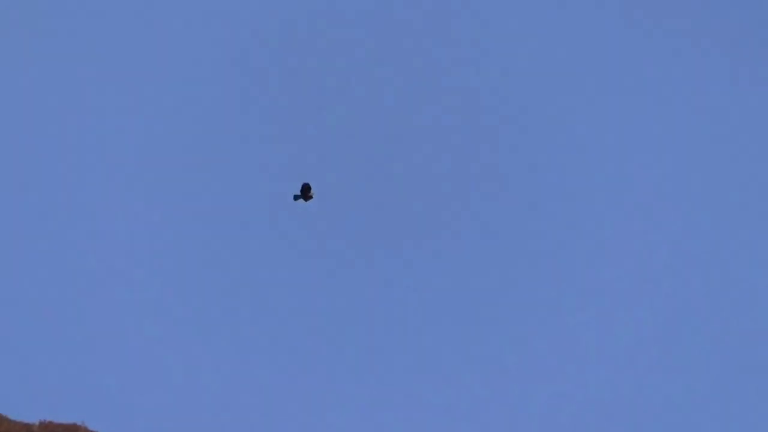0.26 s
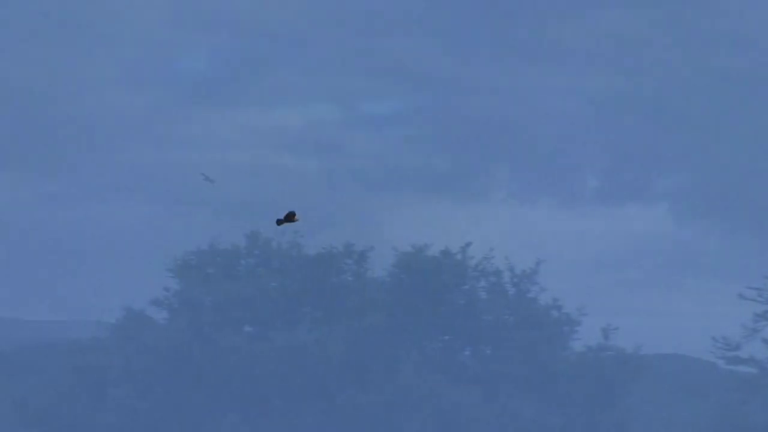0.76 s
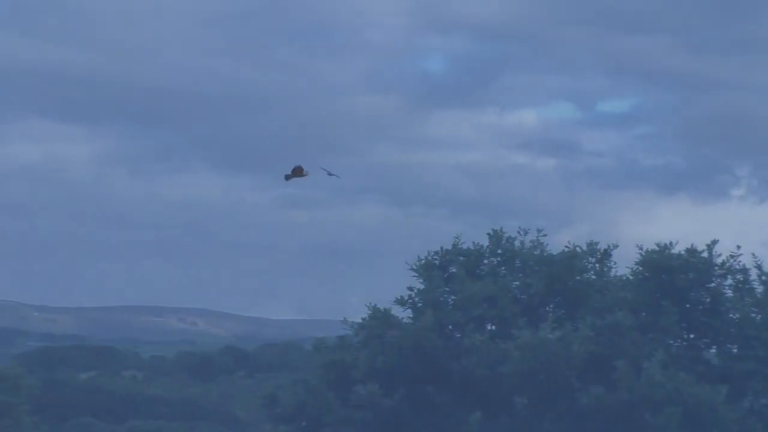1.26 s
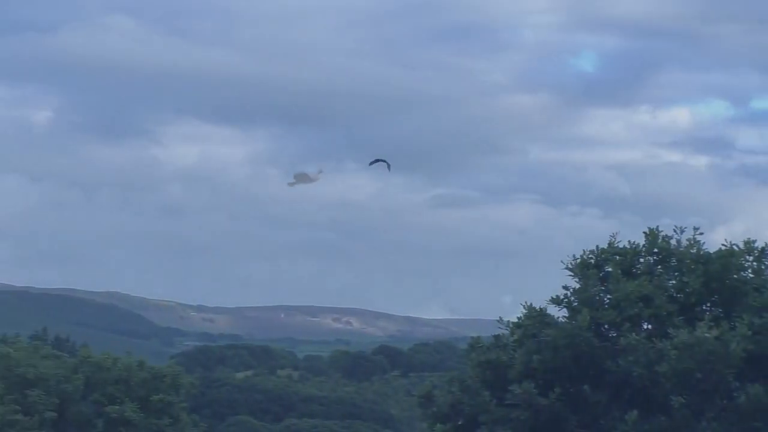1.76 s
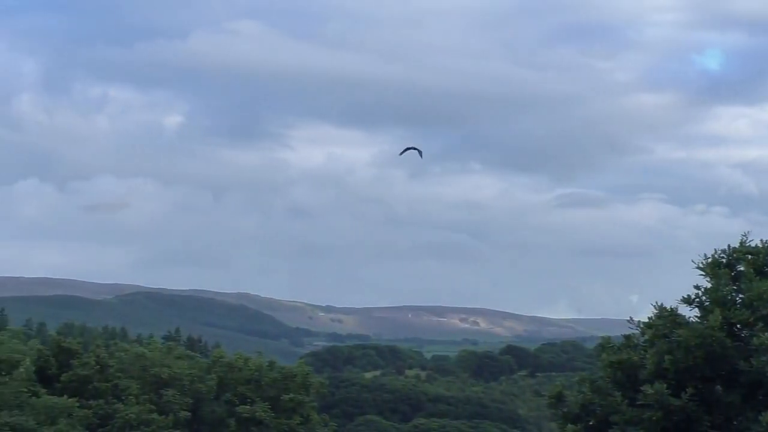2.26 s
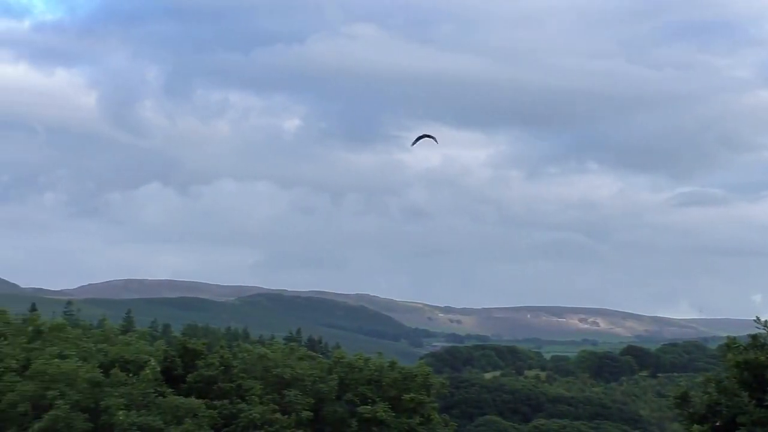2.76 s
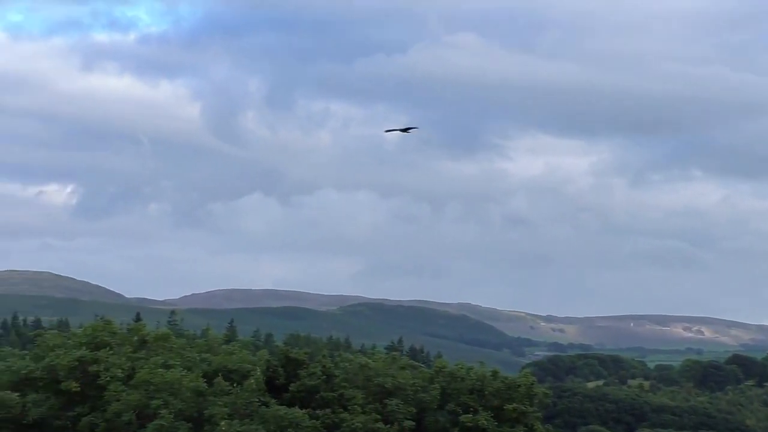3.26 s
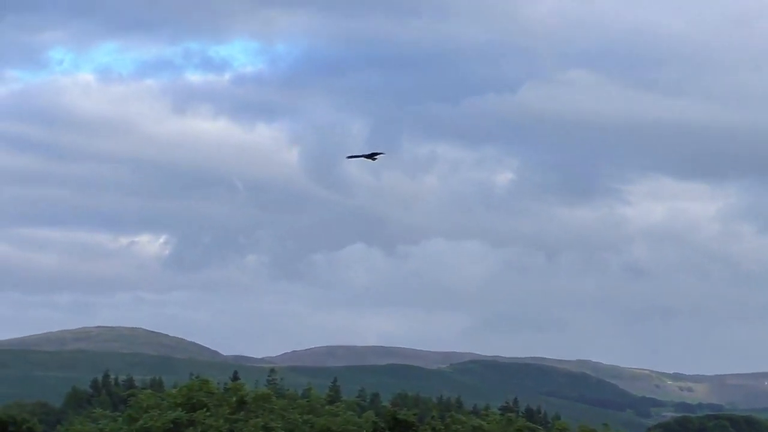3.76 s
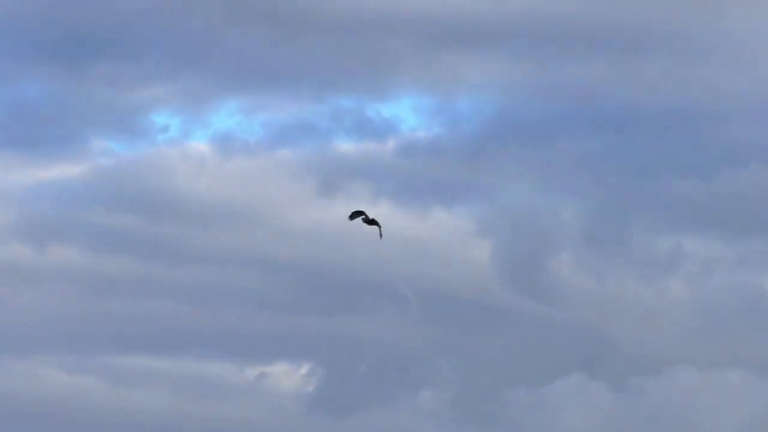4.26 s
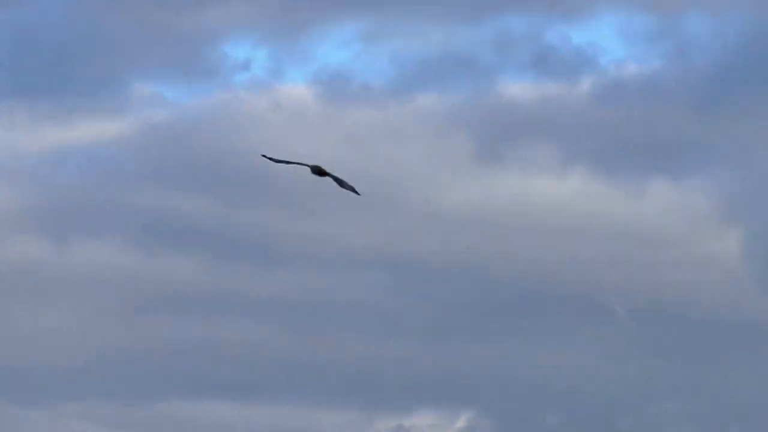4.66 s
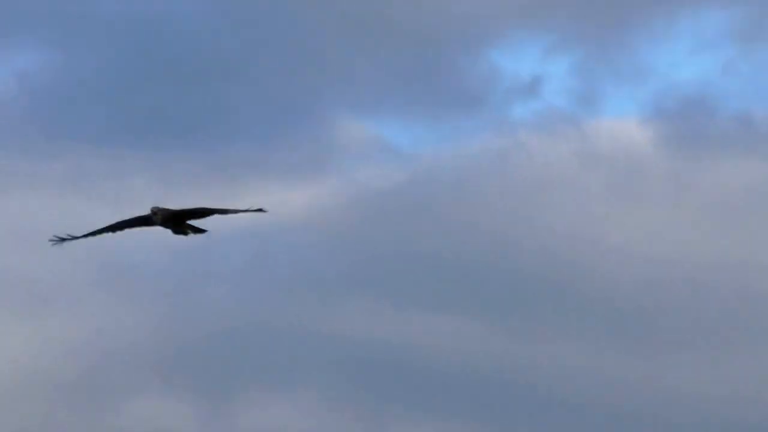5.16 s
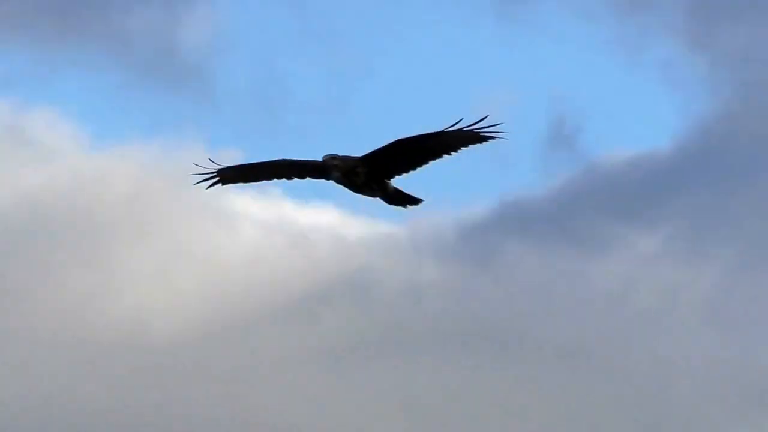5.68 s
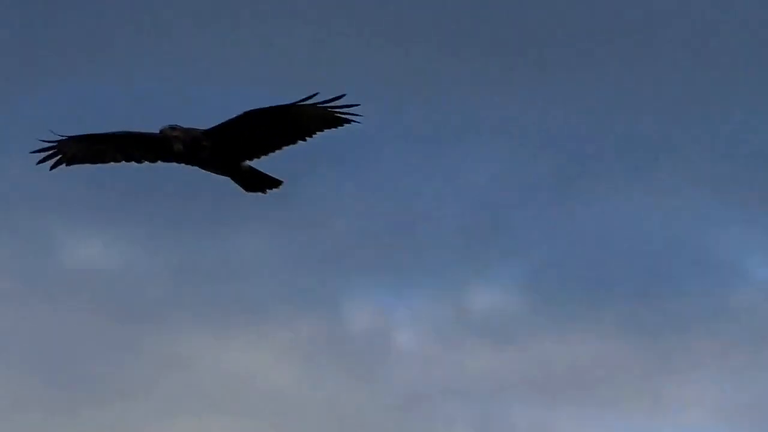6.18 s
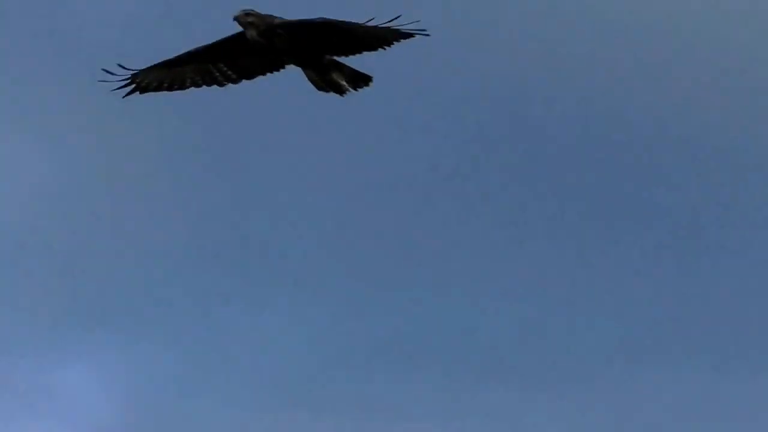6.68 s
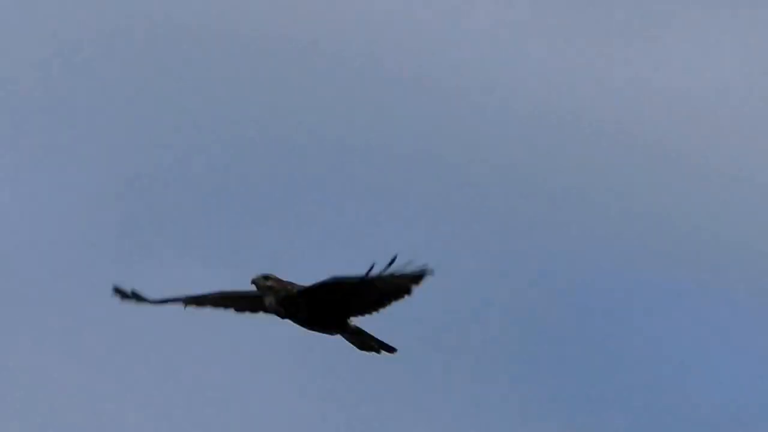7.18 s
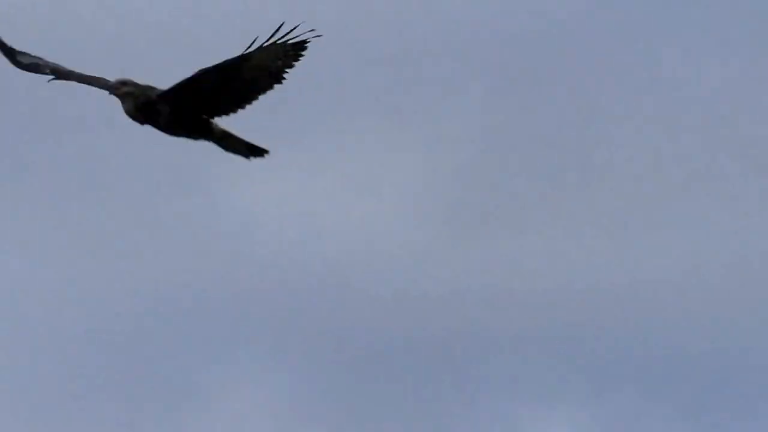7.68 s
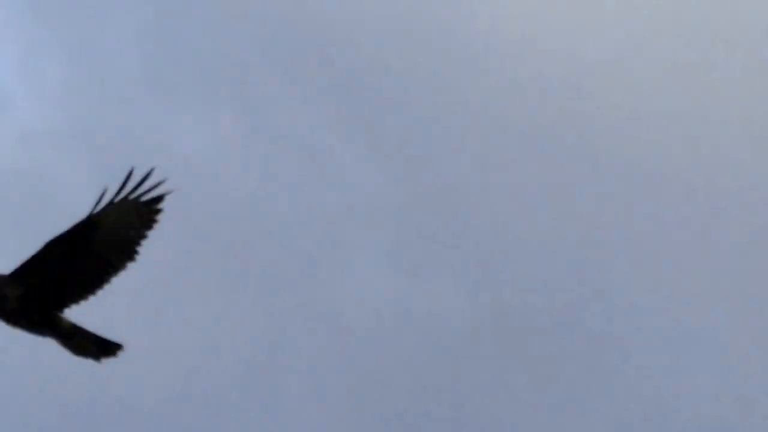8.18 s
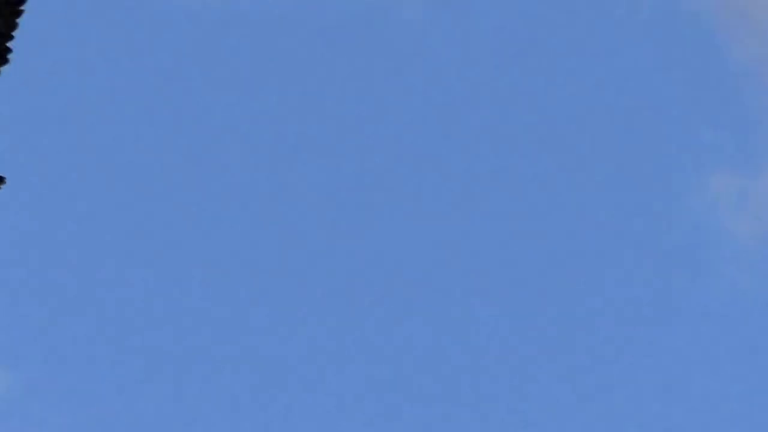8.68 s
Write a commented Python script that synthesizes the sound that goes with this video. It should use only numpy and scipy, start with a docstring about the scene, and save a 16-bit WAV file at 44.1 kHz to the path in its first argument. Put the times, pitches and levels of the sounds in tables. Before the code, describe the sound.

Three drawn-out, cracking cries from a nearby bird of prey echo off trees, with faint far calls and a soft opening hiss.

```python
"""A wooded valley, heard from a camera microphone. A broad hiss opens and fades out while a far bird calls.
At 2.2 s a buzzard mews nearby, its voice wavering and cracking; the trees echo both birds. After some
rustling a low drone comes up. The second mew, at 5 s, breaks into a whistle, and a camera part clicks.
The far bird answers at 6.6 s, and at 8 s the buzzard mews and breaks once more. Valley air, wind on the
microphone and the microphone's own treble hiss run to the end."""
import sys
import numpy as np
from scipy import signal
from scipy.fft import rfft, irfft, next_fast_len
from scipy.io import wavfile
from scipy.ndimage import uniform_filter1d

SR = 44100
rng = np.random.default_rng(int(sys.argv[2]) if len(sys.argv) > 2 else 0)


def log_audio(samples):
    """Write samples as a 16-bit WAV file to the path given in sys.argv[1]."""
    # one column per channel
    frames = np.atleast_2d(samples).T
    # limit to full scale, then quantise
    limited = np.clip(frames, -1, 1)
    pcm = np.round(limited * 32767).astype(np.int16)
    wavfile.write(sys.argv[1], SR, pcm)


N = 393813
T = np.arange(N) / SR
SIDE = np.array([[1], [-1]])  # opposite signs left and right give width

# short rustles: middle t/s, length/s, relative level/dB
RUSTLES = [(2.08, .12, -84), (3.77, 0.048, -86), (4.05, 0.092, -90), (4.4, 0.21, -80), (4.5, .15, -87.5),
           (4.62, .16, -77)]


def buzzard():
    """Close to the microphone: three hoarse mews of twelve harmonics on a wavering pitch."""
    # per unbroken stretch of voice: t/s, second partial f/Hz, its level/dB, others' relative level/dB
    mews = [
        [(2.225, 2430, -75, -15), (2.236, 2460, -50, -22), (2.25, 2790, -51.5, -5), (2.268, 3000, -51.5, 4),
         (2.305, 3030, -42, 4.5), (2.344, 2920, -39.5, -0.5), (2.375, 2720, -47, 2.5), (2.388, 2880, -46.5, -1),
         (2.41, 2875, -45.5, 4), (2.456, 2936, -40.5, 0.5), (2.494, 2665, -47, 3), (2.534, 2810, -42, 1.5),
         (2.585, 2680, -46, 5), (2.617, 2290, -48, -9.5), (2.645, 2560, -48.5, -7), (2.686, 2783, -49.5, 4.5),
         (2.716, 2586, -43, -8), (2.745, 2230, -52.5, -5), (2.79, 2382, -51, -0.5), (2.84, 2153, -53.5, 1),
         (2.855, 2174, -86, -5)],
        [(4.95, 2400, -71, -15), (4.96, 2500, -46.5, -12), (4.976, 2925, -47.5, 7.5), (5.0, 3010, -37, 5.5),
         (5.014, 3155, -43.5, 11.5), (5.028, 2903, -38.5, 5), (5.05, 2850, -42.5, 6), (5.058, 2900, -44.5, 5),
         (5.068, 3040, -41, 3), (5.09, 3126, -41.5, 10), (5.112, 3007, -39.5, 4.5), (5.156, 2790, -44, 6.5),
         (5.198, 2824, -43.5, 7), (5.234, 2894, -40.5, 10), (5.286, 2515, -40.5, -6), (5.298, 2694, -53, -4)],
        [(5.381, 2680, -49, 2.5), (5.401, 2550, -39, -9), (5.443, 2653, -38, -6), (5.471, 2484, -36.5, -13),
         (5.497, 2530, -34.5, -5), (5.523, 2190, -46, -4), (5.551, 2330, -45.5, -6), (5.589, 2604, -42.5, -3.5),
         (5.62, 2217, -47.5, -3), (5.642, 2147, -49, -16), (5.685, 2160, -46.5, -8.5), (5.71, 2070, -64, -16)],
        [(7.992, 2420, -54, -12), (7.998, 2530, -46, -5.5), (8.006, 2790, -39, -1.5), (8.016, 2937, -40.5, 9),
         (8.052, 2927, -36, 10), (8.062, 3265, -41, 12), (8.072, 3006, -37, 9.5), (8.097, 3290, -42.5, 12),
         (8.112, 3460, -54, 21)],
        [(8.168, 2907, -46, 11), (8.186, 2919, -39.5, 11), (8.23, 2881, -35, 11), (8.265, 2780, -36, 4.5),
         (8.298, 2630, -30.5, -6.5), (8.318, 2734, -37.5, -4.5), (8.345, 2810, -39, -1.5),
         (8.368, 2833, -38.5, 1.5), (8.403, 2515, -34.5, -11), (8.466, 2677, -34.5, -5),
         (8.51, 2582, -34.5, -10.5), (8.535, 2240, -40, -8.5), (8.555, 2443, -39, -9.5),
         (8.59, 2590, -37, -4.5), (8.62, 2632, -39.5, -9.5), (8.65, 2130, -44, -9.5), (8.67, 2010, -73, -18)],
    ]
    # throat colour, the other partials against the second: f/Hz, level/dB
    throat = [(1050, -21), (1250, -12), (1450, -17), (1650, -23), (3300, -5), (4300, -13), (5700, -22.5),
              (7200, -34), (9000, -34), (12000, -47), (15000, -49.5)]
    return voice(mews, throat, np.arange(1, 13) / 2, timbre_drift=1, flicker_db=.9, jitter=.0036,
                 shimmer_db=1.8, breath_db=-39, rasp_db=7.5, breath_hz=1300)


def whistles():
    """The buzzard's voice breaks twice into a nearly pure whistle with soft edges and a sagging pitch."""
    # breaks: start t/s, length/s, f/Hz, level/dB
    breaks = [(5.301, 0.077, 2340, -36), (8.116, 0.046, 2360, -31)]
    # colour of the overtones: f/Hz, level/dB
    overtones = [(2300, 5.5), (4700, -21), (7000, -36.5), (12000, -50)]
    sag_hz_per_s, edge_s, edge_db = 730, .036, -9.5
    stretches = []
    for start, length, hz, db in breaks:
        outline = (0, edge_db), (edge_s, 0), (length - edge_s, 0), (length, edge_db)
        stretches.append([(start + t, hz - sag_hz_per_s * t, db + dip, 0) for t, dip in outline])
    return voice(stretches, overtones, np.arange(1, 6), timbre_drift=0, flicker_db=1, jitter=.0035,
                 shimmer_db=1.2, breath_db=-35, rasp_db=6, breath_hz=1300)


def far_bird():
    """Far off in the valley: two faint, falling mews whose upper partials are mostly breath."""
    # per mew: t/s, second partial f/Hz, its level/dB, others' relative level/dB
    mews = [
        [(1.17, 2500, -77, -12), (1.19, 2528, -67.5, -10), (1.29, 2470, -61, -10), (1.32, 2375, -64, -10),
         (1.42, 2296, -67, -10)],
        [(6.615, 2125, -76, 2), (6.635, 2357, -54.5, -5), (6.655, 2540, -52.5, -7.5), (6.69, 2588, -59, 3),
         (6.75, 2518, -56, 1.5), (6.82, 2398, -53, -1), (6.9, 2335, -58.5, 2), (6.98, 2296, -67.5, 10),
         (7.08, 2214, -68.5, 9), (7.19, 2184, -73.5, 13), (7.3, 2067, -71, 11), (7.35, 2090, -90.5, 18)],
    ]
    # throat colour, the other partials against the second: f/Hz, level/dB
    throat = [(1050, -21), (1300, -18), (3400, -24), (4600, -40), (7000, -40), (12000, -47)]
    return voice(mews, throat, np.arange(1, 13) / 2, timbre_drift=0, flicker_db=.5, jitter=.004,
                 shimmer_db=3, breath_db=-53, rasp_db=34, breath_hz=1100)


def voice(stretches, throat, multiples, timbre_drift, flicker_db, jitter, shimmer_db,
          breath_db, rasp_db, breath_hz):
    """A bird's throat: partials at multiples of a wavering lead partial, each smeared by air noise."""
    # the voice cracks for an instant: middle t/s, length/s, pitch jump/%
    cracks = [(2.388, 0.013, 4.5), (2.501, 0.0081, 3), (2.634, 0.011, 4), (2.73, 0.015, -2),
              (5.017, 0.015, 4), (5.056, 0.009, 6.5), (5.456, .01, -4.5), (8.06, 0.018, 1.5),
              (8.396, 0.011, -3.5)]
    # the lowest partial waxes and wanes on its own: t/s, relative level/dB
    lowest = [(2.23, 15), (2.3, -6), (2.35, 0), (2.41, 2), (2.5, 2), (2.56, -4), (2.62, -7), (2.69, 1),
              (2.77, -11), (2.85, -4), (4.96, 2.5), (5.0, -2.5), (5.06, 0.5), (5.11, -1), (5.17, -2),
              (5.24, -2), (5.29, 2.5), (5.4, -4), (5.44, 4), (5.49, -1.5), (5.59, -0.5), (5.65, -6),
              (5.7, -1.5), (8.0, 1.5), (8.05, -15.5), (8.105, 2), (8.19, -4), (8.23, -7), (8.29, -0.5),
              (8.345, 8), (8.4, 2), (8.47, 4), (8.51, 9), (8.535, 2.5), (8.61, 3), (8.66, 9)]
    # spells of alternating strong and weak cycles: middle t/s, length/s, level/dB
    doublings = [(2.3, 0.12, -62), (2.535, 0.048, -56), (2.785, 0.086, -65), (4.992, 0.038, -65.5),
                 (5.21, 0.071, -54), (8.04, 0.071, -75), (8.225, 0.092, -53)]
    # the lines they add between the partials: multiple of the lead partial, relative level/dB
    half_lines = [(.75, 0), (1.25, -8), (1.75, -6), (2.25, -16), (2.75, -22), (3.25, -26)]
    bright_hz, dull_db_per_octave = 2904, 12
    glide, ramp = int(.009 * SR), .0019 * SR  # samples
    throat_hz, throat_db = np.transpose(throat)
    out = np.zeros(N)
    for rows in stretches:
        times, *columns = np.transpose(rows)
        span = slice(int((times[0] - .002) * SR), int((times[-1] + .003) * SR))
        t = T[span]
        n = len(t)
        hz, lead_db, others_db = (uniform_filter1d(np.interp(t, times, c), glide) for c in columns)
        hz = hz * (1 + sum(jump / 100 * bell(t, at, length) for at, length, jump in cracks))
        phase = 2 * np.pi * np.cumsum(hz * (1 + jitter * walk(197.2, n))) / SR
        # as the pitch sinks, partials above the third dull, the highest most
        dull_db = dull_db_per_octave * np.minimum(np.log2(hz / bright_hz), 0)
        lowest_db = curve(lowest, 0)[span]
        lines = []
        for m in multiples:
            drift_db = timbre_drift * ((m < 1) * lowest_db + max(m - 1.5, 0) * dull_db)
            flutter_db = flicker_db * min(m, 2.5) * walk(35, n)
            colour_db = np.interp(np.log(m * hz), np.log(throat_hz), throat_db)
            against_lead_db = 0 if m == 1 else others_db + drift_db + flutter_db + colour_db
            lines.append((m, undb(lead_db + against_lead_db)))
        lines += [(m, undb(db) * bumps(doublings, t)) for m, db in half_lines]
        edge = np.clip(np.minimum(np.arange(n), np.arange(n)[::-1]) / ramp, 0, 1)
        for m, gain in lines:
            hoarseness = undb(min(breath_db + rasp_db * m, 9))  # grows toward the high partials
            breath = hoarseness * (walk(breath_hz, n) + 1j * walk(breath_hz, n))
            tone = (undb(shimmer_db * walk(93.96, n)) + breath) * np.exp(1j * m * phase)
            out[span] += np.sqrt(2) * edge * gain * (m * hz < .45 * SR) * tone.real
    return out


def trees(call, branch_db, branch_t60, slope_db, slope_t60, slope_delay_s):
    """Quick scatter from near branches, then a longer wash from the slopes, blurred by moving leaves."""
    # colour of the scatter off the branches: f/Hz, level/dB
    branches = [(900, 1.5), (2000, 0), (3000, -1), (4500, 1.5), (6500, 1.5), (10000, -23)]
    # colour of the wash off the wooded slopes: f/Hz, level/dB
    slopes = [(900, -7), (1900, -4.5), (2250, 1), (2550, -1.5), (2800, 5), (3200, -10), (4200, -11.5),
              (6000, -41), (10000, -42.5)]
    t = T[:3 * SR // 2]
    quick = undb(-60 * t / branch_t60) * np.clip(t / .00387, 0, 1)
    late = undb(-60 * t / slope_t60) * np.clip((t - slope_delay_s) / .01, 0, 1)
    out = 0
    for channels in (np.ones((2, 1)), undb(-63.5) * SIDE):
        scatter = colour(call * (.6 + .8 * walk(200)), branches)
        wash = colour(call * walk(300), slopes)
        for source, decay, db in ((scatter, quick, branch_db), (wash, late, slope_db)):
            tail = rng.standard_normal(len(t)) * decay / np.sqrt(np.sum(decay ** 2))
            out = out + channels * undb(db) * signal.fftconvolve(source, tail)[:N]
    return out


def camera_click():
    """Right at the microphone, a small hard camera part snaps and bounces, ringing its short modes."""
    # the snap and its bounces: t/s, relative level/dB
    blows = [(5.5295, -40), (5.5310, -36), (5.5326, -23), (5.5333, -23), (5.5347, -32), (5.5366, -40)]
    # modes of the part: f/Hz, relative level/dB, t60/s
    modes = [(1300, -4.5, .010), (2300, -14, .006), (4800, -17, .005), (7300, -10, .004), (9300, -6, .004),
             (11900, 2.5, .004), (14500, -8, .004)]
    out, t = np.zeros(N), T[:SR // 20]
    for at, blow_db in blows:
        ring = sum(undb(db - 60 * t / t60) * np.sin(2 * np.pi * (hz * t + rng.random()))
                   for hz, db, t60 in modes)
        snap = undb(-10 - 60 * t / .005) * rng.standard_normal(len(t))
        start = int(at * SR)
        out[start:start + len(t)] += undb(blow_db) * (ring + snap)
    low_cut = signal.butter(5, 1000, "high", fs=SR, output="sos")  # too small to push bass
    thin = undb(2) * signal.sosfilt(low_cut, out)
    return thin + undb(-28) * np.roll(thin, 40) * SIDE


def opening_hiss():
    """A broad hiss, partly wide, that holds steady and then fades away."""
    # spectrum in the middle: f/Hz, level/dB
    mid_colour = [(59, -47), (100, -30), (144, -10), (262, -2.5), (458, -4.5), (577, -9), (1370, 5.5),
                  (1830, 0.5), (2360, -1.5), (8570, -31), (10000, -55), (13000, -65.5), (22000, -120)]
    # spectrum at the sides: f/Hz, level/dB
    side_colour = [(59, -25), (100, 0), (269, 1), (581, -13.5), (1100, -3.5), (2100, -1.5), (5440, -19),
                   (6540, -36), (8000, -58), (10400, -68.5), (17600, -120)]
    mid = undb(-55) * noise(mid_colour, .69, 4.52)
    side = undb(-63.5) * noise(side_colour, .8, 6.2)
    return opening_fade() * (mid + side * SIDE)


def valley_air():
    """The soft rush of the open valley, fuller while the opening hiss lasts."""
    # its slow rise and fall: t/s, level/dB
    levels = [(0, -70), (3.0, -77.5), (4.5, -76.5), (5.4, -77.5), (6.0, -82.5), (6.9, -79.5), (7.85, -82.5),
              (8.15, -73), (8.45, -76.5), (8.93, -79)]
    # its spectrum: f/Hz, level/dB
    spectrum = [(210, -18.5), (350, -1), (385, -5), (423, -4), (571, -11.5), (709, -6), (813, -6),
                (1330, -4), (3880, -17.5), (5910, -25.5), (9000, -23), (11700, -42), (19800, -120)]
    return np.hypot(undb(curve(levels)), undb(-72) * opening_fade()) * noise(spectrum, .75, 5.5)


def rustle():
    """A few faint, brief swells of bright, flickering noise."""
    # spectrum of the rustling: f/Hz, level/dB
    spectrum = [(470, -46), (800, -30.5), (1020, 9), (1570, -10), (1750, -1), (2300, -3), (2470, -2),
                (15000, -17)]
    return undb(5) * bumps(RUSTLES) * noise(spectrum, .69, 21.2)


def wind():
    """Wind rumbles and thumps on the microphone, its two ports differently, over a faint wide rush."""
    # thumps on the microphone: middle t/s, length/s, relative level/dB
    buffets = [(5.15, 0.052, -62.5), (5.54, .05, -62), (6.715, 0.12, -55.5), (7.04, 0.045, -64.5),
               (7.14, 0.06, -69), (7.45, 0.049, -66), (7.3, 0.054, -69), (7.585, 0.046, -59),
               (7.69, .06, -67), (8.4, 0.066, -68)]
    # spectrum of the rumble: f/Hz, level/dB
    rumble_colour = [(8.8, -37.5), (15, -19.5), (27, -14.5), (91, -4.5), (155, -1.5), (225, -6.5),
                     (288, -22.5), (400, -36), (520, -61), (880, -120)]
    # spectrum of the air at the sides: f/Hz, level/dB
    side_colour = [(12, -33.5), (20, -14), (192, -3), (305, -4.5), (376, -3.5), (611, -21), (1060, -11),
                   (1540, -10.5), (2870, -12.5), (5000, -27), (6500, -41), (11000, -120)]
    gust = np.hypot(swell(level_db=-73, share=.62, opening_db=-85), undb(1.5) * bumps(buffets))
    rumble = gust * noise(rumble_colour, 1.8, 9.9)
    wide_air = undb(-84.5) * noise(side_colour, 2, 8.6)
    ports = undb(-22.5) * gust * noise([(15, 2), (50, -13), (120, -13.5), (400, -47.5)], 1.6, 20)
    return rumble + (wide_air + ports) * SIDE


def murmur():
    """A low band of noise that swells and sinks with the wind."""
    spectrum = [(150, -4.5), (220, 5.5), (300, 0), (400, -16), (520, -36.5)]  # f/Hz, level/dB
    return swell(level_db=-77.5, share=1.1, opening_db=-75.5) * noise(spectrum, 1.4, 8)


def drone(hz=184):
    """One low tone, unsteady in pitch and level, loudest under the second mew."""
    # its rise and fall: t/s, relative level/dB
    levels = [(3.9, -81), (4.22, -72.5), (4.9, -72), (5.11, -59.5), (5.47, -61), (5.57, -64.5), (5.64, -94)]
    gain = undb(curve(levels) + 2.5 + 3 * walk(25))
    return gain * np.sin(2 * np.pi * np.cumsum(hz * (1 + .015 * walk(25))) / SR)


def microphone_hiss():
    """The microphone's own treble hiss; it never stops, and rises with the wind and the rustling."""
    # spectrum of the self-noise: f/Hz, level/dB
    spectrum = [(3500, -45), (6000, -20), (7800, -12), (9000, -6), (9700, 0), (12500, 0), (15000, -3),
                (16000, -6)]
    floor = swell(level_db=-73, share=.35, opening_db=-80.5)
    return np.hypot(floor, undb(7.5) * bumps(RUSTLES)) * noise(spectrum, .68, 2.3)


def near_bounce(x, db, delay_s=.0029):
    """A surface near the microphone repeats the sound once, combing it."""
    return x + undb(db) * np.roll(x, round(delay_s * SR))


def swell(level_db, share, opening_db):
    """Amplitude of a background layer: it follows a common swell and is fuller during the opening hiss."""
    # the background swells and sinks: t/s, relative level/dB
    levels = [(0, 2), (2.1, -8), (2.6, 4.5), (3.1, -3.5), (3.8, -3), (4.5, 3.5), (4.9, 5), (5.15, 9),
              (5.52, 11.5), (5.75, 0.5), (6.2, 3.5), (6.55, -1.5), (7.1, 5.5), (7.9, 0.5), (8.05, 12),
              (8.3, 6.5), (8.7, 2), (8.93, 5.5)]
    return np.hypot(undb(level_db + share * curve(levels, 0)), undb(opening_db) * opening_fade())


def opening_fade(from_s=.97, to_s=2.226):
    """Steady at 1, then an even fade to silence."""
    return np.clip((to_s - T) / (to_s - from_s), 0, 1)


def noise(spectrum, flicker_db, flicker_hz):
    """Coloured noise of rms 1 whose octave bands each flicker on their own."""
    octaves = np.arange(-4, 5) / 4
    skirt_db = 20 * np.log10(np.cos(np.pi / 2 * octaves) + .01)  # neighbouring bands sum to flat power
    out = 0
    for hz in 30 * 2. ** np.arange(10):
        band = colour(rng.standard_normal(N), np.transpose([hz * 2 ** octaves, skirt_db]))
        out = out + band * undb(flicker_db * walk(flicker_hz))
    out = colour(out, spectrum)
    return out / np.sqrt(np.mean(out ** 2))


def colour(x, points):
    """Filter by (f/Hz, level/dB) points joined on a log frequency axis."""
    hz, db = np.transpose(points)
    size = next_fast_len(len(x))
    f = np.maximum(np.arange(size // 2 + 1) * SR / size, 1)
    gain = undb(np.interp(np.log(f), np.log(hz), db))
    return irfft(rfft(x, size) * gain, size)[:len(x)]


def walk(rate_hz, size=N):
    """Random levels held 1 / rate_hz seconds and smoothed twice; spread near 1."""
    hold = max(int(SR / rate_hz), 2)
    steps = np.repeat(rng.standard_normal(size // hold + 1), hold)
    return 1.465 * uniform_filter1d(uniform_filter1d(steps, hold), hold)[:size]


def curve(rows, outside_db=-120):
    """A (t/s, level/dB) table at every sample."""
    times, db = np.transpose(rows)
    return np.interp(T, times, db, outside_db, outside_db)


def bumps(rows, t=T):
    """Amplitude of (middle t/s, length/s, level/dB) events."""
    return sum(undb(db) * bell(t, middle, length) for middle, length, db in rows)


def bell(t, middle, length):
    """A smooth rise to 1 and fall."""
    return np.exp(-(2 * (t - middle) / length) ** 2)


def undb(db):
    """Decibels to amplitude."""
    return 10 ** (np.asarray(db) / 20)


def scene():
    """At the microphone: the near bird mostly direct, the far one deep in echo, the valley behind."""
    near, far = buzzard() + whistles(), far_bird()
    echoes = trees(near, branch_db=-10.5, branch_t60=.33, slope_db=-23, slope_t60=.78, slope_delay_s=.053)
    echoes += trees(far, branch_db=-8.5, branch_t60=.25, slope_db=-3.5, slope_t60=1, slope_delay_s=.14)
    foreground = near + far + echoes + camera_click() + opening_hiss()
    background = near_bounce(valley_air() + rustle(), db=-5) + wind() + murmur() + drone()
    return foreground + background + near_bounce(microphone_hiss(), db=-12)


def record(dry):
    """The recorder cuts the top steeply."""
    top_hz = 15750
    return signal.sosfilt(signal.ellip(10, .2, 60, top_hz, fs=SR, output="sos"), dry)


dry = scene()
out = record(dry)
log_audio(out)
```